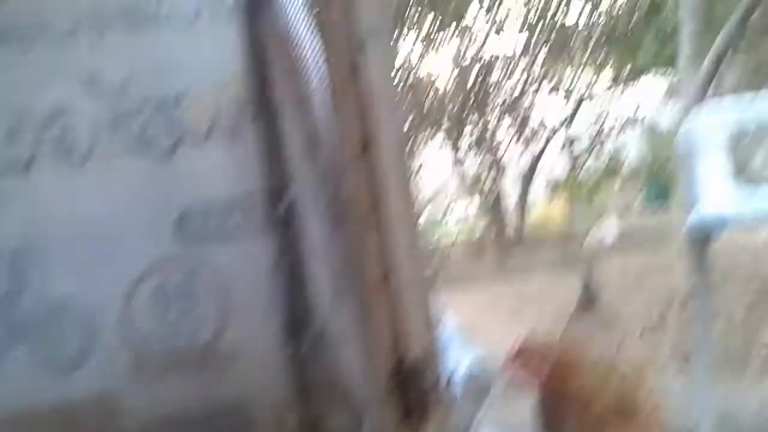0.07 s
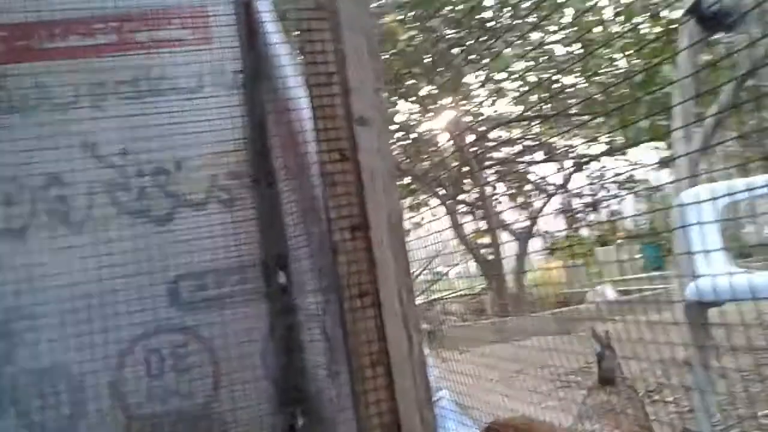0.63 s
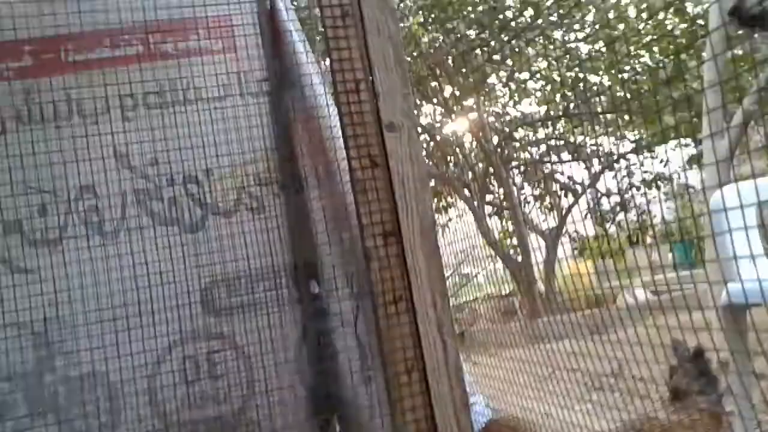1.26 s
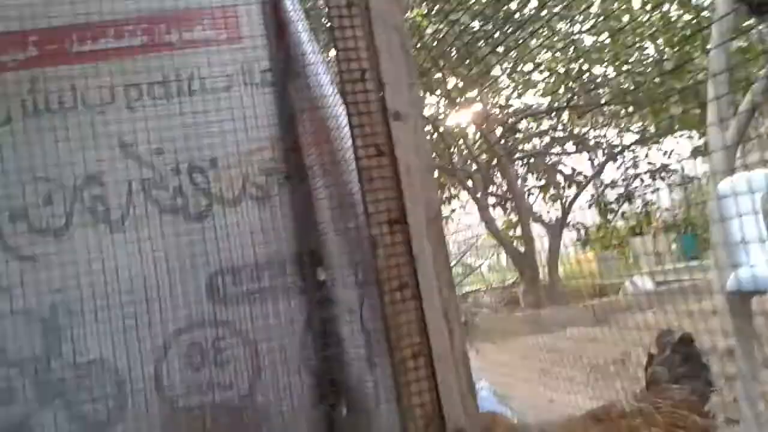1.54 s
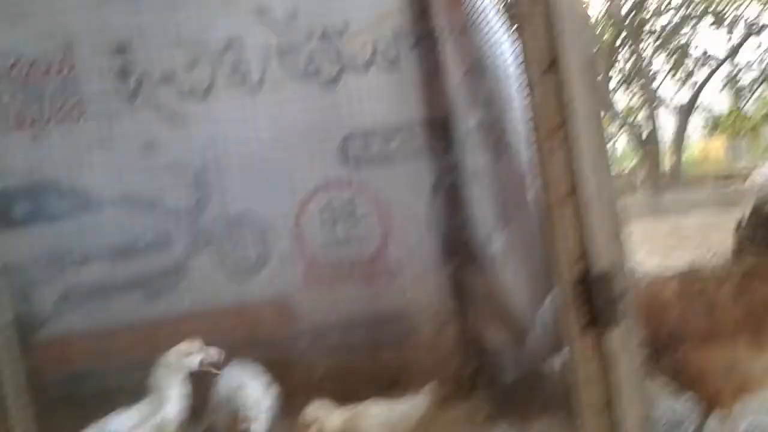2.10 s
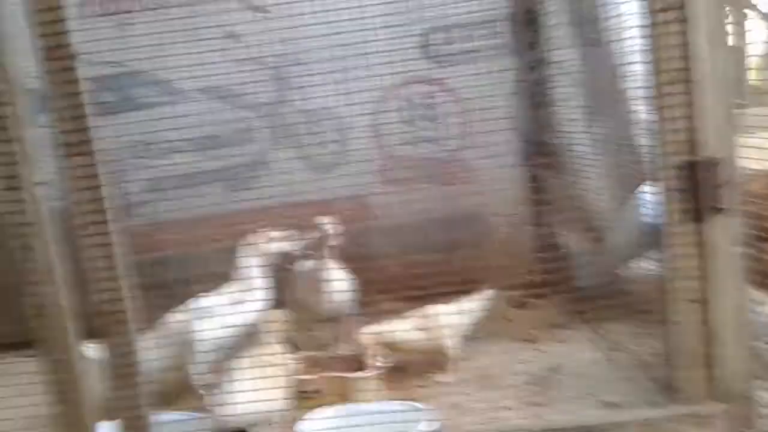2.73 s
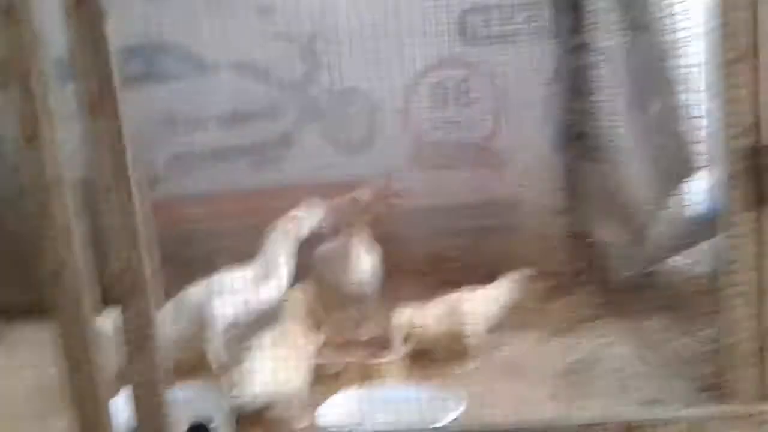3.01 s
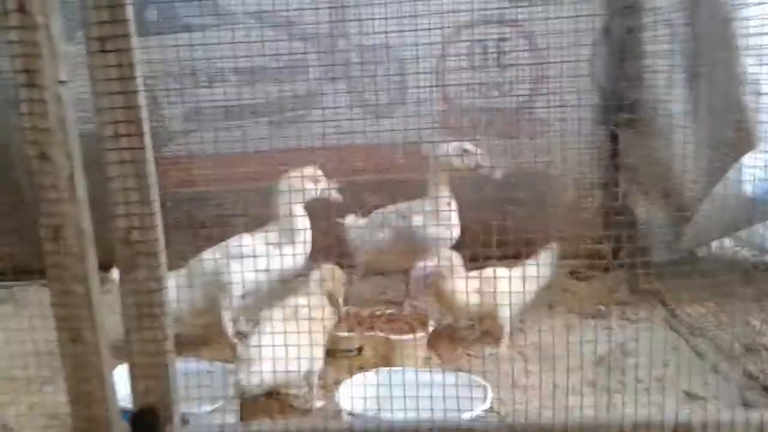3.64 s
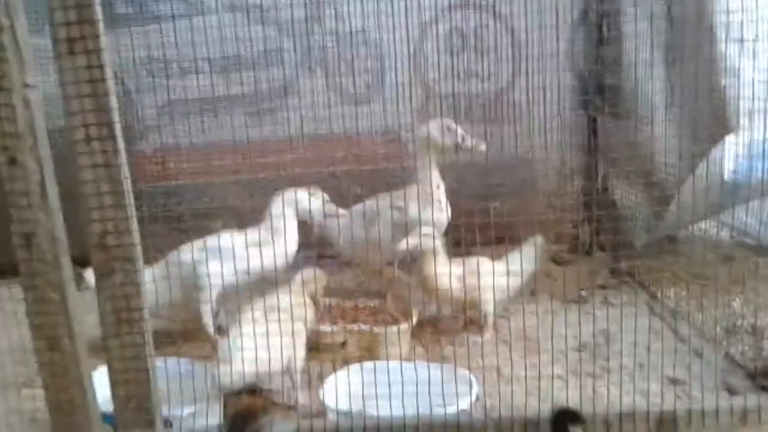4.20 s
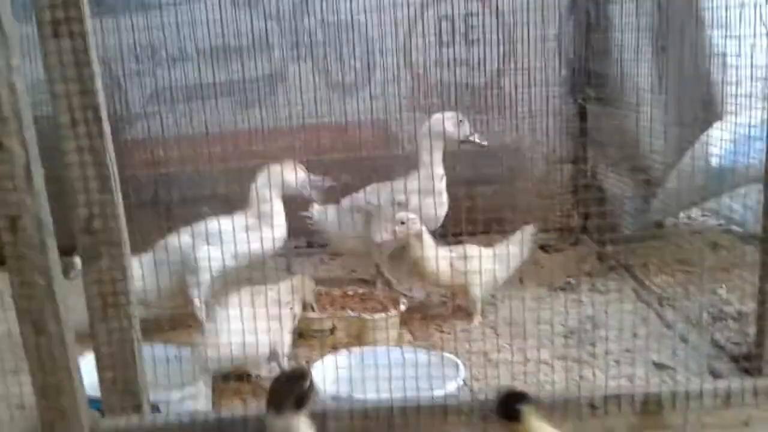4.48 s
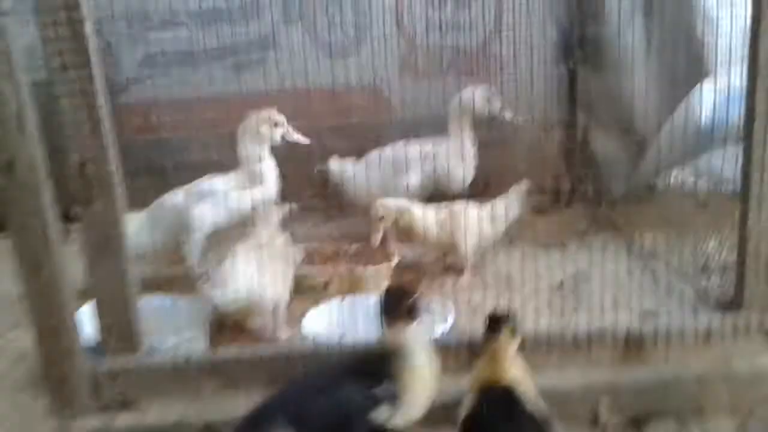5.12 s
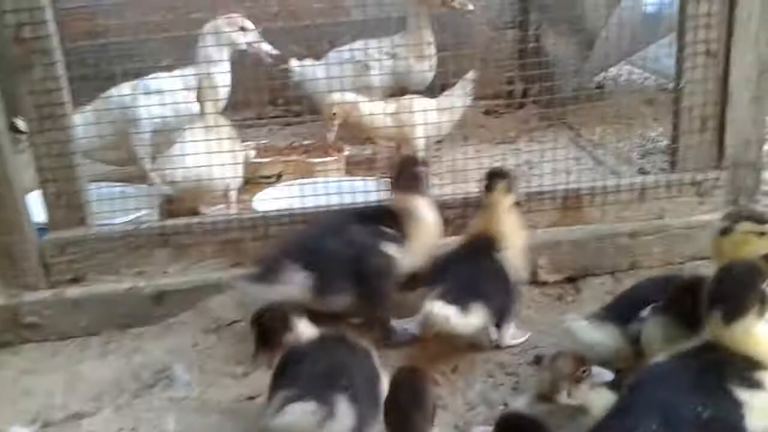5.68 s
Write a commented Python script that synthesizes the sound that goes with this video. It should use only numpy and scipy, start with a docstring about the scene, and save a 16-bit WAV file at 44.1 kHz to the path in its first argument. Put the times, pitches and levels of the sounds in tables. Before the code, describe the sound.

In a farmyard by a duck pen, a distant engine hums faintly under a soft rush of outdoor air. A nearby hen lets out a long, rough call that grows louder and breaks into short surges. Right after it she cackles in an even rhythm, one hoarse cluck after another, easing a little near the end. A few soft throat pops and tiny ticks come with the clucks.

```python
"""A distant engine hums under the soft rush of a yard beside a duck pen, from start to end.
A hen's throat pops, and at half a second she draws out one long rasping call: pulses from her
syrinx, shaped by the resonances of throat and beak. From 1.6 s she cackles in a steady rhythm,
each cluck a hoarse lead-in, a loud core where the voice breaks, and a creaky fall.
Soft pops precede many clucks; two small ticks sound as the cackle begins, one near its end."""
import sys
import numpy as np
from scipy import signal
from scipy.fft import rfft, irfft
from scipy.io import wavfile
from scipy.ndimage import uniform_filter1d

SR = 44100
rng = np.random.default_rng(int(sys.argv[2]) if len(sys.argv) > 2 else 0)


def generate_wav(signal):
    """Clip the signal to [-1, 1] and save it as 16-bit WAV at the path in sys.argv[1]."""
    frames = np.transpose(np.atleast_2d(signal))
    scaled = np.clip(frames, -1, 1) * 32767
    pcm = np.round(scaled).astype(np.int16)
    wavfile.write(sys.argv[1], SR, pcm)


N = 262395
TIME = np.arange(N) / SR
HZ = np.maximum(np.arange(N + 1) * SR / (2 * N), 1)

# formants of the long call, beak nearly shut: (frequency [Hz], width [Hz], level [dB])
SHUT_FORMANTS = [(808, 240, -2), (1108, 200, -6), (1341, 230, 0.5), (1477, 125, 2.5), (1955, 294, -20),
                 (2304, 180, -21), (2650, 320, -26), (3000, 186, -23), (3803, 410, -20.5),
                 (4283, 230, -22.5), (4940, 610, -33), (5680, 450, -39.5), (6470, 660, -36),
                 (8410, 1500, -47.5), (12500, 6700, -57)]
# formants of clucking, before the beak shifts them: (frequency [Hz], width [Hz], level [dB])
CLUCK_FORMANTS = [(480, 290, -20.5), (729, 156, -17), (1018, 221, -4), (1179, 212, 0.5), (1366.4, 183, 3),
                  (1563, 237, -8), (1770, 266, -16), (2100, 320, -26.5), (2500, 760, -26),
                  (3720, 640, -27.5), (4160, 370, -29.5), (4820, 650, -34.5), (5780, 500, -40),
                  (6370, 600, -35.5), (7700, 1900, -48.5), (12500, 9600, -60.5)]


def from_db(db):
    """Decibels to amplitude ratio."""
    return 10 ** (np.asarray(db) / 20)


def unit_rms(x):
    """Normalisation to unit power."""
    return x / np.sqrt(np.mean(x ** 2) + 1e-20)


def contours(rows):
    """Linear interpolation of rows (time [s], values...), one curve per value."""
    times, *columns = np.transpose(rows)
    return [np.interp(TIME, np.maximum.accumulate(times), column) for column in columns]


def drift(hz):
    """Random modulation of unit power, through hz new values a second."""
    knots = rng.standard_normal(4000)
    return unit_rms(np.interp(TIME * hz, np.arange(len(knots)), knots))


def filtered(x, response):
    """Convolution, as a product with a frequency response on the grid HZ."""
    return irfft(rfft(x, 2 * N) * response)[:N]


def coloured_noise(spectrum):
    """White noise shaped by rows (frequency [Hz], level [dB]), at unit power."""
    hz, db = np.transpose(spectrum)
    response = from_db(np.interp(np.log(HZ), np.log(hz), db))
    return unit_rms(filtered(rng.standard_normal(N), response))


def resonator(formants, stretch=1):
    """Minimum-phase response of steep-sided resonances; stretch scales their frequencies."""
    power = sum(from_db(db) ** 2 / (1 + ((HZ - stretch * hz) / (width / 1.3)) ** 2) ** 4
                for hz, width, db in formants)
    cepstrum = irfft(np.log(power + 1e-9) / 2)
    cepstrum[1:N] *= 2
    cepstrum[N + 1:] = 0
    return np.exp(rfft(cepstrum))


def impulses(times, sizes):
    """Fractional delay: each impulse is shared between two adjacent samples."""
    at = np.clip(np.asarray(times) * SR, 0, N - 2)
    whole = at.astype(int)
    before = np.bincount(whole, sizes * (1 - at + whole), N)
    return before + np.bincount(whole + 1, sizes * (at - whole), N)


def running_rms(x, window_s):
    """Amplitude envelope: the root of the power after two moving averages."""
    size = max(int(window_s * SR), 2)
    return np.sqrt(np.maximum(uniform_filter1d(uniform_filter1d(x * x, size), size), 1e-14))


def yard(rush_follows=.35):
    """Amplitude-modulated noise: a low rumble, and a rush of open air that swells with it."""
    # loudness of the rumble: (time [s], level [dB])
    rumble_levels = [(.4, -64.5), (.7, -57), (1.4, -56.5), (1.8, -62), (2.4, -64.5), (3.0, -54), (3.6, -61),
                     (5.95, -62)]
    # spectral density of the rumble: (frequency [Hz], relative level [dB])
    rumble_spectrum = [(20, -22.5), (50, -7.5), (80, -22.5), (140, 1), (240, -3), (360, 1), (520, -7.5),
                       (800, -21), (1500, -42.5)]
    # spectral density of the rush: (frequency [Hz], relative level [dB])
    rush_spectrum = [(200, -21.5), (600, 5), (1300, 0), (2000, -1.5), (3000, -5), (4000, -8), (5500, -15.5),
                     (8000, -17.5), (14000, -20), (16000, -26.5)]
    rumble_db, = contours(rumble_levels)
    rush_db = -59 + rush_follows * (rumble_db - rumble_db.mean())
    rumble = from_db(rumble_db + 1.8 * drift(18)) * coloured_noise(rumble_spectrum)
    rush = from_db(rush_db + .21 * drift(6.7)) * coloured_noise(rush_spectrum)
    return rumble + rush


def engine(firing_hz=30.04, waver_db=2.58, speed_drift=.00297):
    """Periodic firing gives a harmonic series; each order swells and fades on its long way."""
    # how strongly the engine carries: (time [s], level [dB])
    levels = [(.3, -57), (1.35, -52.5), (1.9, -57), (3.2, -53.5), (5.1, -54), (5.6, -53), (5.9, -57)]
    # harmonics: (multiple of the firing rate, relative level [dB])
    orders = [(1, -26), (2, -14.5), (3, -8.5), (4, -8.5), (5, -4.5), (6, -2.5), (7, -20), (9, -18.5),
              (10, -14.5), (12, -13), (13, -18.5)]
    level_db, = contours(levels)
    cycles = np.cumsum(firing_hz * (1 + speed_drift * drift(2.083))) / SR
    hum = sum(from_db(db + waver_db * drift(2.5)) * np.sin(2 * np.pi * (order * cycles + rng.random()))
              for order, db in orders)
    return np.sqrt(2) * from_db(level_db) * hum


def throat_pops(trim_db=-4.5):
    """Impulse response of the throat, excited by single soft pulses: most as the syrinx closes, one with the
    first tick."""
    # soft pops, most ahead of the voice, one with the first tick: (time [s], peak level before the trim [dB])
    pops = [(0.431, -40), (1.562, -36), (2.878, -34.5), (3.12, -36.5), (3.399, -31.5), (3.678, -28.5),
            (4.147, -30), (4.61, -33), (4.824, -36), (5.046, -38), (5.303, -46), (5.875, -47)]
    times, level_db = np.transpose(pops)
    throat = resonator(CLUCK_FORMANTS)
    return filtered(impulses(times, from_db(level_db + trim_db)), throat) / np.abs(irfft(throat)).max()


def syrinx(pitch, rough, throb_hz, throb_depth, jitter, limp, swing_db, shimmer_db, wander, air):
    """A self-oscillating valve, one pulse a cycle; roughness brings period doubling, then scatter."""
    rough = np.clip(rough, 0, 1)
    tremor = .012 * drift(260)
    cycles = np.cumsum(pitch * (1 + tremor + wander * rough * drift(120))) / SR
    times = np.interp(np.arange(1, int(cycles[-1])), cycles, TIME)
    pulse_rough, pulse_hz, limp, swing_db = (np.interp(times, TIME, np.broadcast_to(curve, N))
                                             for curve in (rough, pitch, limp, swing_db))
    time_scatter, size_scatter = rng.standard_normal((8000, 2))[:len(times)].T
    # pulses alternate in strength (swing) and in spacing (limp)
    alternation = (-1) ** np.arange(len(times))
    scatter_db = pulse_rough ** 2 * shimmer_db * np.clip(size_scatter, -1.5, 1.5)
    sizes = from_db(pulse_rough * swing_db * alternation + scatter_db)
    late_cycles = limp * np.sqrt(pulse_rough) * alternation + jitter * pulse_rough ** 2 * time_scatter
    pulses = impulses(times + late_cycles / pulse_hz, sizes)
    opening = 1 + np.cos(2 * np.pi * cycles)  # air escapes once a cycle
    hiss = air * (.16 + rough) * rng.standard_normal(N) * opening
    # a second membrane beats against the first
    beats = np.cumsum(throb_hz * (1 + .4076 * rough ** 2 * drift(150))) / SR
    return (pulses + hiss) * (1 + np.clip(throb_depth, 0, 1) * np.cos(2 * np.pi * beats))


def ragged_db(rough):
    """Random amplitude modulation: a hoarse voice catches and surges."""
    return 2.6 * np.clip(rough, 0, 1) * np.clip(drift(85), -2, 1.3)


def treble_of(voice, corner_hz=2400):
    """High-pass filtering keeps the partials above the main formants."""
    return filtered(voice, 1 / (1 + (corner_hz / HZ) ** 8))


def fluttering(treble, depth_rad=.36):
    """Random phase modulation makes the upper partials unsteady in pitch."""
    analytic = signal.hilbert(treble, 2 ** 19)[:N]
    return np.real(analytic * np.exp(1j * depth_rad * drift(400)))


def long_call(attack_s=.005, release_s=.0089, sag_hz_per_db=1.5, clearing_per_db=.017):
    """Source and filter: rough pulses through a nearly shut beak break into clearer surges."""
    # pulse rate apart from the surges: (time [s], frequency [Hz])
    pitches = [(.475, 741), (.52, 855), (.64, 768.4), (.77, 800.5), (.95, 765), (1.1, 727.3), (1.22, 765.5),
               (1.32, 741.3), (1.36, 696), (1.41, 692), (1.49, 302.3)]
    # the push behind the call: (time [s], level [dB], roughness [0-1 once clipped])
    efforts = [(.475, -42.5, 0.9), (.53, -49.5, 0.52), (.63, -36, 0.82), (.82, -32, 0.63),
               (.97, -35.5, 0.7), (1.12, -37, 0.6), (1.43, -34, .33), (1.485, -42, 1.17)]
    # Gaussian surges: (time [s], half length [s], gain [dB], brightening [dB])
    surges = [(1.076, 0.031, 12.5, 3.5), (1.177, 0.03, 9, -4), (1.252, 0.021, 20.5, 2),
              (1.313, 0.022, 8, -16), (1.369, 0.019, 15.5, -4), (1.415, .018, 13, 1)]
    pitch, = contours(pitches)
    effort_db, rough = contours(efforts)
    push_db = effort_db - np.mean([db for _, db, _ in efforts])
    surge_db = sum(db * np.exp(-((TIME - s) / half_s) ** 2) for s, half_s, db, _ in surges)
    bright_db = sum(db * np.exp(-((TIME - s) / half_s) ** 2) for s, half_s, _, db in surges)
    rough = np.clip(rough - clearing_per_db * surge_db, 0, 1)
    pitch = pitch - sag_hz_per_db * surge_db
    puffs_db = 2 * rough * np.clip(drift(70), -2, 1.5)
    # the fundamental fades as the pitch sinks under the lowest resonance
    sunk_db = np.clip(.4 * (715 - pitch), 0, 11.5)
    fundamental_db = -42.5 + .33 * (push_db + surge_db) - sunk_db
    treble_db = -56 + .98 * push_db + .27 * surge_db + bright_db - sunk_db / 2
    pulses = syrinx(pitch, rough, throb_hz=125, throb_depth=.45 * rough ** 2, jitter=.19,
                    limp=.06, swing_db=7.5, shimmer_db=3.5, wander=.028, air=.028)
    voice = filtered(pulses, resonator(SHUT_FORMANTS))
    low = filtered(voice, 1 / (1 + (HZ / 930) ** 24))
    treble = treble_of(voice)
    bands = [(low, fundamental_db, .015),
             (voice - low - treble, effort_db + surge_db, .011),
             (fluttering(treble), treble_db, .025)]
    call = sum(from_db(db) * band / running_rms(band, window_s) for band, db, window_s in bands)
    start, end = efforts[0][0], efforts[-1][0]
    gate = np.clip((TIME - start) / attack_s, 0, 1) * np.clip(1 + (end - TIME) / release_s, 0, 1)
    return gate * from_db(puffs_db + .7 * ragged_db(rough)) * call


def ticks(attack_s=.0012, decay_s=.006, ring_q=7.6, scratch_db=-26.5):
    """Short noise bursts each excite one damped resonance: small, dry, bright scratches."""
    # exciting bursts: (time [s], level before filtering [dB], resonance [Hz])
    bursts = [(1.56, -33.5, 5430), (1.856, -32.5, 5300), (5.667, -37.5, 4503)]
    out = np.zeros(N)
    for start, level_db, hz in bursts:
        age = np.maximum(TIME - start, 0)
        envelope = (1 - np.exp(-age / attack_s)) * np.exp(-age / decay_s)
        burst = envelope * rng.standard_normal(N) + 1e-18
        ring = signal.lfilter(*signal.iirpeak(hz, ring_q, fs=SR), burst)
        out += from_db(level_db) * (ring + from_db(scratch_db) * burst)
    return out


def cluck_gesture(start, crack, fall, creak_s, hz, fall_hz, lead_db, core_db, creak_db, rough, beak):
    """Register breaks: the voice jumps from hoarse lead-in to core, then to a slackening creak."""
    snap_s, release_s = .0025, .02
    drop_hz_per_s, sag_hz_per_s = 600, 350
    lead_s, end = crack - start, fall + creak_s
    late_hz = hz + drop_hz_per_s * lead_s  # a longer lead-in drops further at the break
    early_hz = late_hz + sag_hz_per_s * lead_s
    end_hz = .52 * fall_hz
    hoarse = np.clip(.15 * (-24.5 - lead_db), 0, .784)  # a weaker lead-in is hoarser
    shut = np.clip(5.6 * lead_s, 0, 1)  # a long one passes through a nearly shut beak
    bright_db = -2.5 + 2.5 * beak + 2.5 * rough
    throb_hz = 116 + 114.6 * rough
    # timbre: (roughness [0-1], treble gain [dB], throb depth [0-1], shut share [0-1], throb rate [Hz])
    lead = (hoarse, bright_db - 3, .2, shut, throb_hz)
    core = (rough, bright_db, .11 + .43 * rough, 0, throb_hz)
    creak = (.6106, bright_db, .3, 0, 112.1)
    # (time [s], level [dB], pitch [Hz], timbre...)
    rows = [(start - 2 * snap_s, -90, early_hz, *lead),
            (start, lead_db - 3, early_hz, *lead),
            (start + .25 * lead_s, lead_db, early_hz, *lead),
            (crack - snap_s, lead_db + .5, late_hz, *lead),
            (crack + snap_s, core_db + .5, hz, *core),
            ((crack + fall) / 2, core_db + 1, (hz + fall_hz) / 2, *core),
            (fall - snap_s, core_db - .5, fall_hz, *core),
            (fall + snap_s, creak_db, .75 * fall_hz, *creak),
            (end, creak_db - 16.5, end_hz, *creak),
            (end + release_s, -90, end_hz, *creak)]
    return [(*row, beak) for row in rows]


def cackle(lead_fundamental_db=-9):
    """A varying filter on a pulse source: where the beak narrows, the clucks' formants sink and dull."""
    # clucks: (start [s], break [s], fall [s], creak length [s], pitch at break [Hz], pitch at fall [Hz],
    # lead-in level [dB], core level [dB], creak level [dB], roughness [0-1], beak opening [0-1])
    clucks = [(1.588, 1.701, 1.719, 0.032, 641.4, 603, -34, -27, -25, 0.48, 0.35),
              (1.87, 1.947, 1.971, 0.041, 696.4, 659, -38, -28, -25.5, 0.61, 0.73),
              (2.145, 2.229, 2.271, 0.027, 672.4, 659.6, -35.5, -20, -34, 0.09, 0.72),
              (2.41, 2.476, 2.512, 0.047, 686.6, 644, -37.5, -24, -29, 0.3, 0.9),
              (2.653, 2.704, 2.763, 0.036, 658.7, 666.5, -35.5, -23, -35.5, 0.23, 0.92),
              (2.899, 2.945, 2.963, 0.032, 728, 699, -39.5, -30.5, -25, .67, 1),
              (3.144, 3.182, 3.202, 0.04, 710, 696.4, -33.5, -21.5, -27.5, 0.14, 1),
              (3.417, 3.516, 3.552, 0.04, 642.4, 631.6, -30, -22, -37, 0.26, 0.8),
              (3.701, 3.754, 3.79, .031, 622.6, 600.7, -28.5, -27.5, -30, 0.52, 0.58),
              (3.926, 3.952, 4, 0.071, 650.3, 680, -36, -22.5, -26, .06, 0),
              (4.167, 4.19, 4.262, .04, 695, 595, -33, -24, -33, .25, .3),
              (4.386, 4.442, 4.467, .035, 657.7, 618.2, -32, -27, -23, 0.75, 0.22),
              (4.634, 4.642, 4.683, .042, 701.6, 635.8, -28, -23.5, -25, .11, .15),
              (4.85, 4.859, 4.918, 0.037, 689.7, 637.4, -27.5, -24.5, -29.5, 0.02, 0.02),
              (5.066, 5.084, 5.117, 0.041, 657, 656, -34, -25.5, -24.5, 0.45, 0.18),
              (5.327, 5.348, 5.4, 0.089, 657, 607, -29.5, -28, -33.5, .2, .25),
              (5.552, 5.6, 5.623, 0.051, 647, 636.2, -42.5, -29, -31, .34, 0.43),
              (5.903, 5.919, 5.945, 0.019, 650, 667, -37, -32, -44, .4, 1)]
    # colouring by a narrowed beak: (frequency [Hz], gain [dB])
    narrow_beak = [(450, 1.5), (660, -8), (850, -6), (1200, 1), (2600, 0), (3700, 1.5), (6000, -6),
                   (12000, -4.5)]
    gestures = [row for cluck in clucks for row in cluck_gesture(*cluck)]
    level_db, pitch, rough, bright_db, throb_depth, shut, throb_hz, beak = contours(gestures)
    pulses = syrinx(pitch, rough, throb_hz, throb_depth, jitter=.17, limp=.035 + .023 * shut,
                    swing_db=2.5 + 4.2 * shut, shimmer_db=1.5, wander=.045, air=.047)
    narrowing = from_db(np.interp(HZ, *np.transpose(narrow_beak)))
    thinning = from_db(np.interp(HZ, [800, 1050], [lead_fundamental_db, 0]))
    open_voice = filtered(pulses, resonator(CLUCK_FORMANTS, stretch=1.02))
    narrow_voice = filtered(pulses, resonator(CLUCK_FORMANTS, stretch=.97) * narrowing)
    shut_voice = filtered(pulses, resonator(SHUT_FORMANTS) * thinning)
    voice = (1 - shut) * (beak * open_voice + (1 - beak) * narrow_voice) + shut * shut_voice
    voice /= running_rms(voice, window_s=.012)
    treble = treble_of(voice)
    envelope = from_db(level_db + ragged_db(rough))
    return envelope * (voice - treble + from_db(bright_db) * fluttering(treble))


def surroundings(direct, tail_db=-31, t60_s=.69):
    """Early reflections and a thin, exponentially decaying scatter from trees and fences."""
    # reflections from the pen and walls: (delay [s], level [dB])
    echoes = [(.0065, -18), (.017, -25), (.092, -40)]
    delays, echo_db = np.transpose(echoes)
    scatter = rng.standard_normal(N) * from_db(-60 * TIME / t60_s) * (TIME > .01)
    response = impulses(delays, from_db(echo_db)) + from_db(tail_db) * scatter / np.linalg.norm(scatter)
    return direct + filtered(direct, rfft(response, 2 * N))


def scene():
    """Superposition: the hen and ticks with their reflections, over the engine and the air."""
    near = long_call() + cackle() + throat_pops() + ticks()
    return (surroundings(near) + engine() + yard())[None]


def record(dry):
    """An elliptic low-pass filter cuts the highest treble steeply."""
    cutoff_hz = 15700
    return signal.sosfilt(signal.ellip(12, .1, 90, cutoff_hz, fs=SR, output="sos"), dry)


dry = scene()
out = record(dry)
generate_wav(out)
```